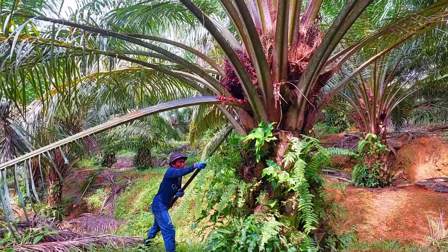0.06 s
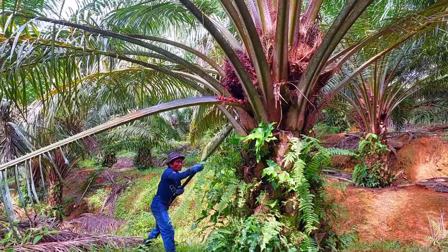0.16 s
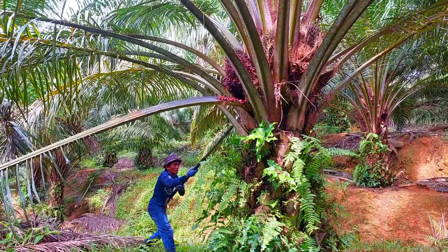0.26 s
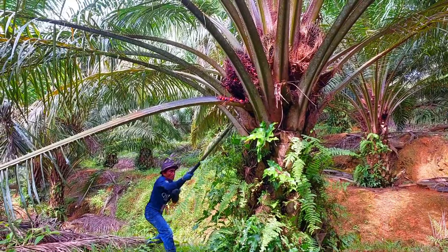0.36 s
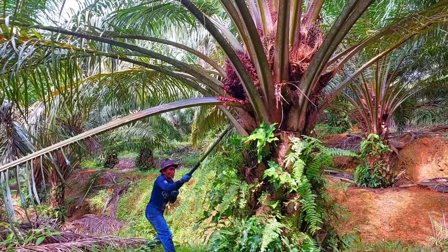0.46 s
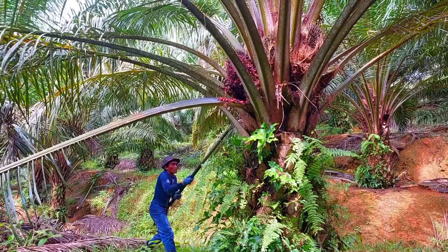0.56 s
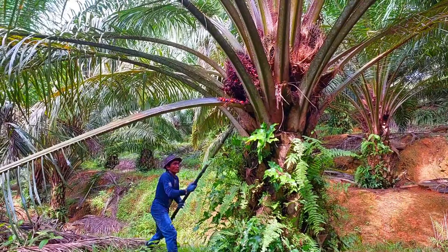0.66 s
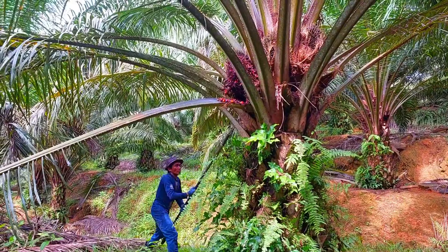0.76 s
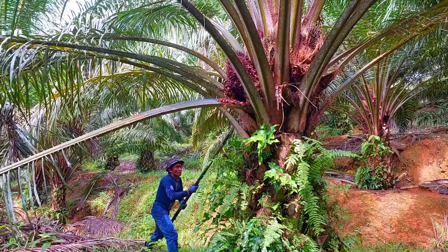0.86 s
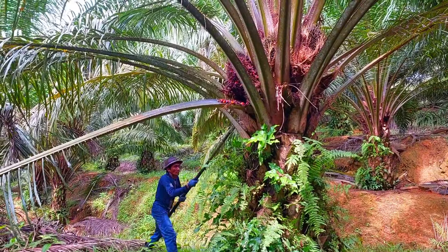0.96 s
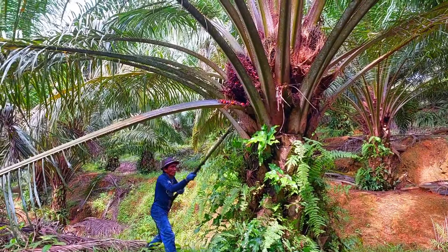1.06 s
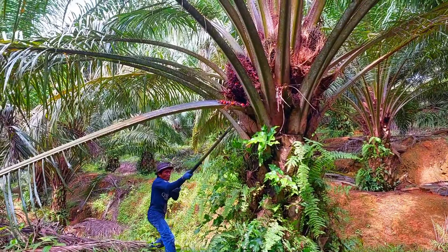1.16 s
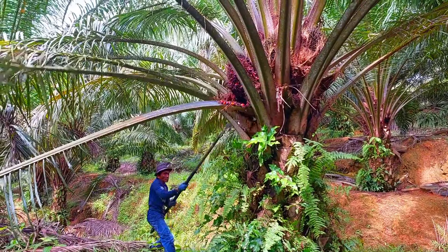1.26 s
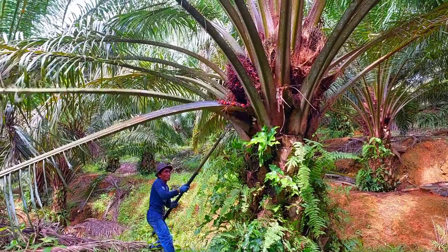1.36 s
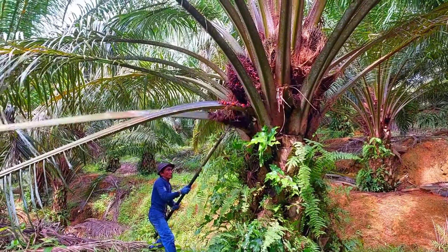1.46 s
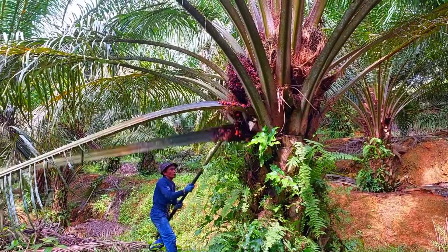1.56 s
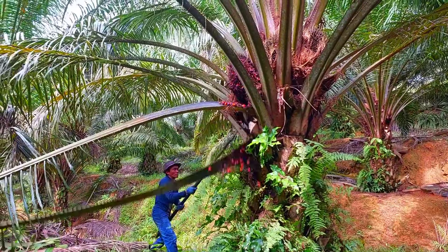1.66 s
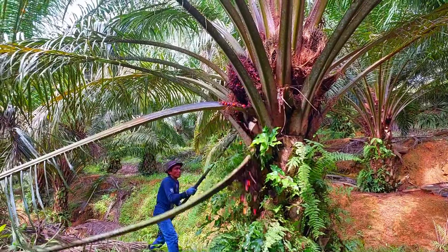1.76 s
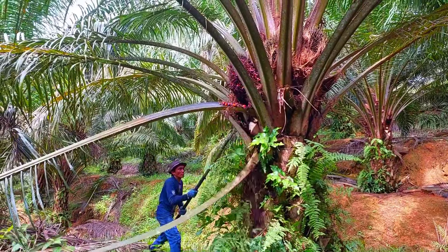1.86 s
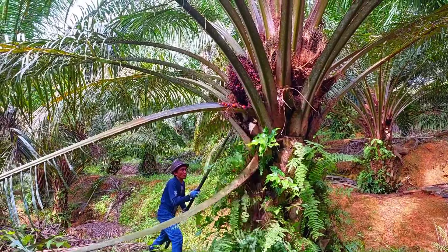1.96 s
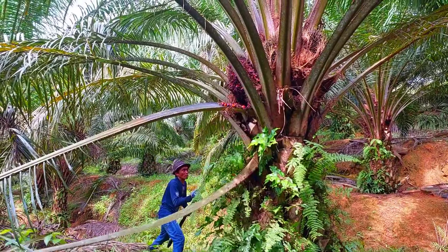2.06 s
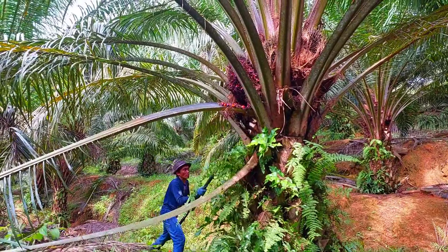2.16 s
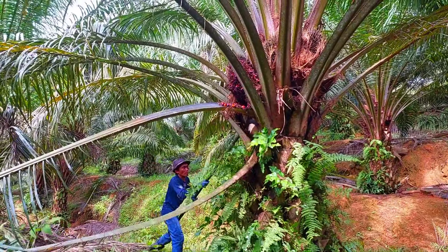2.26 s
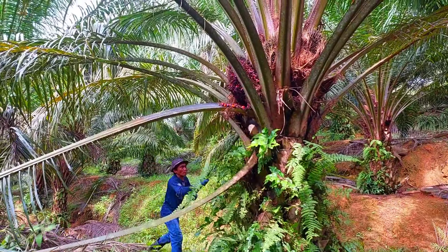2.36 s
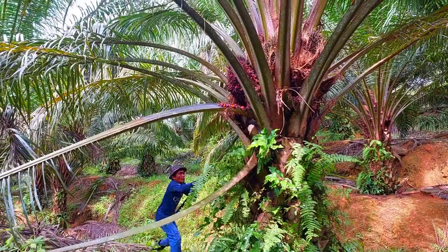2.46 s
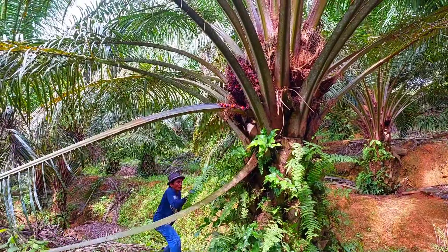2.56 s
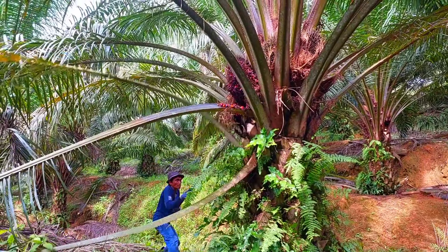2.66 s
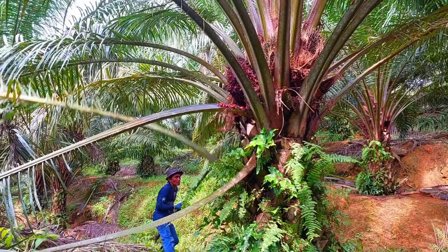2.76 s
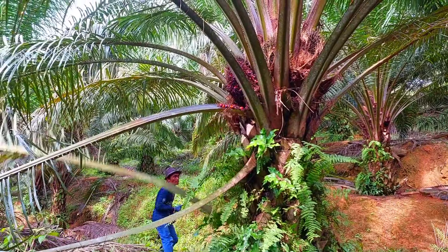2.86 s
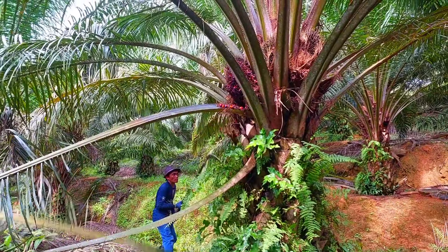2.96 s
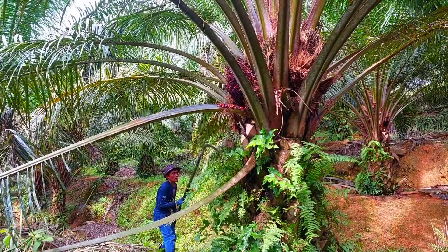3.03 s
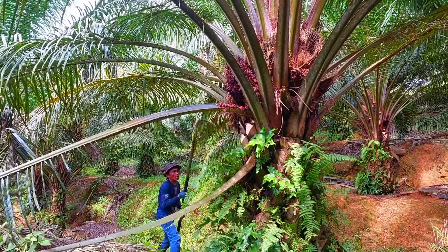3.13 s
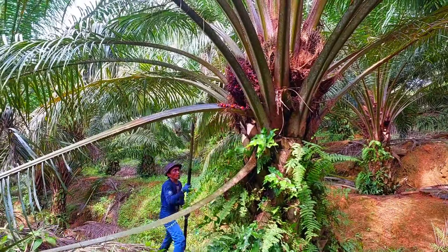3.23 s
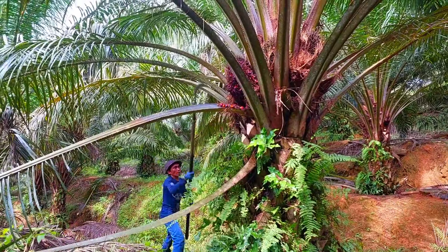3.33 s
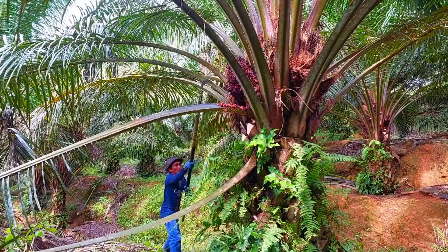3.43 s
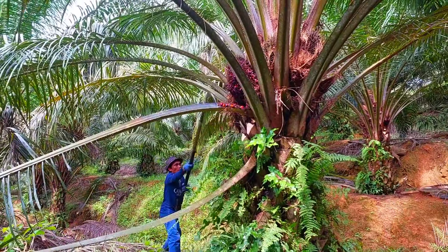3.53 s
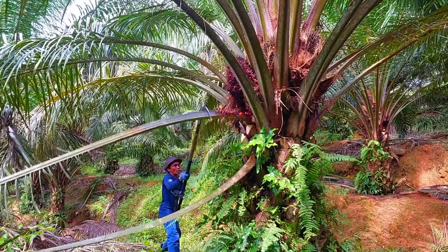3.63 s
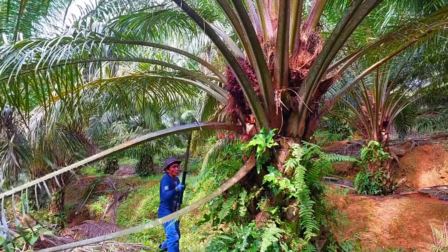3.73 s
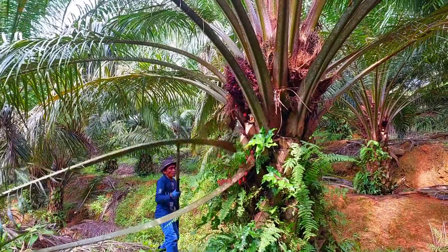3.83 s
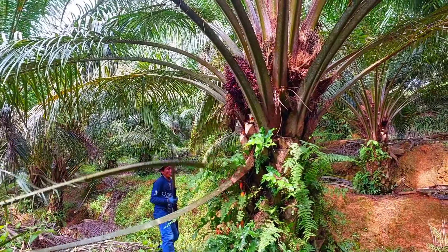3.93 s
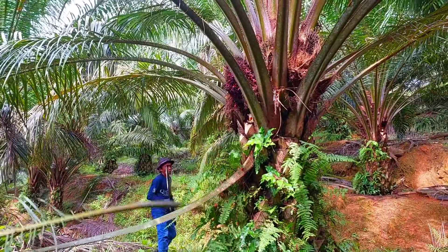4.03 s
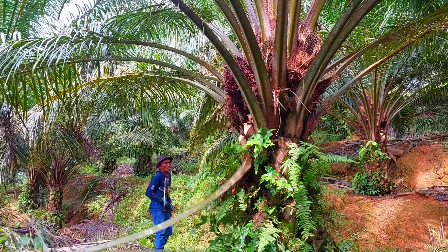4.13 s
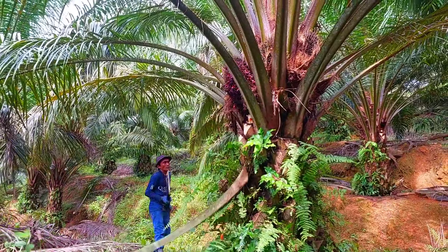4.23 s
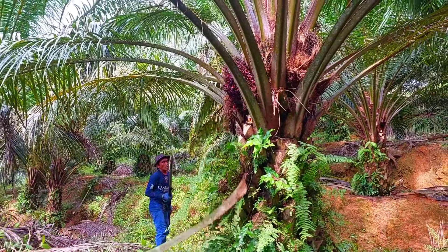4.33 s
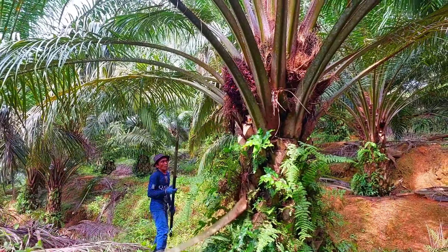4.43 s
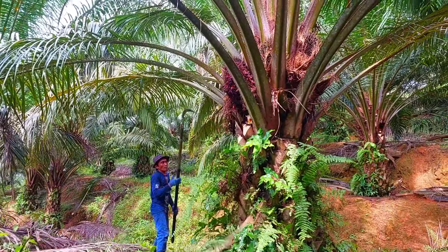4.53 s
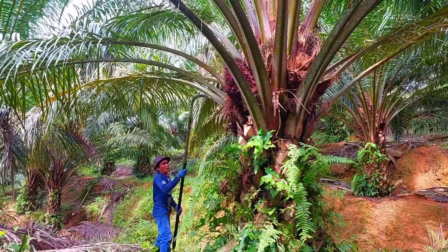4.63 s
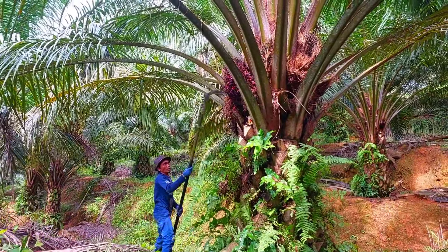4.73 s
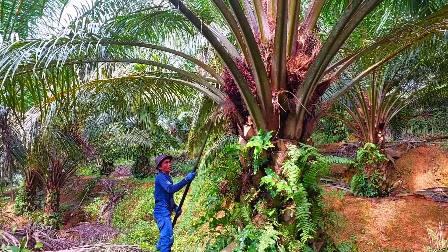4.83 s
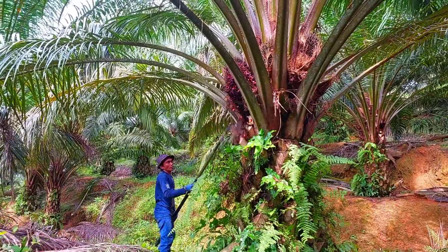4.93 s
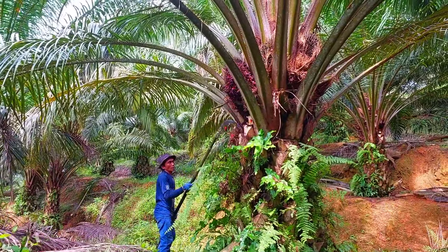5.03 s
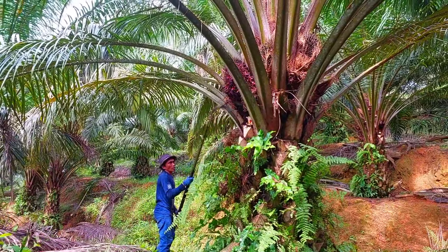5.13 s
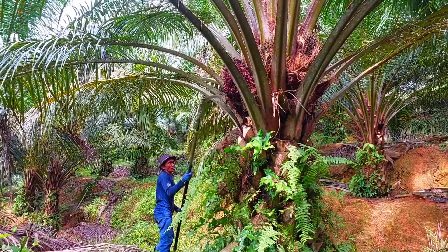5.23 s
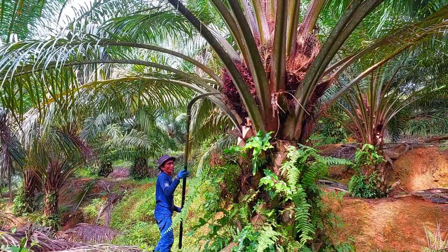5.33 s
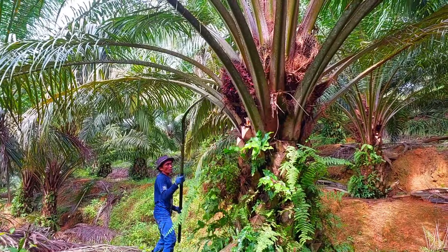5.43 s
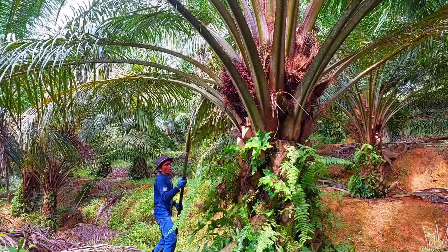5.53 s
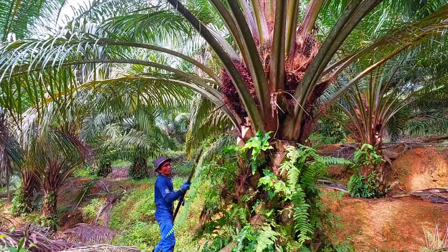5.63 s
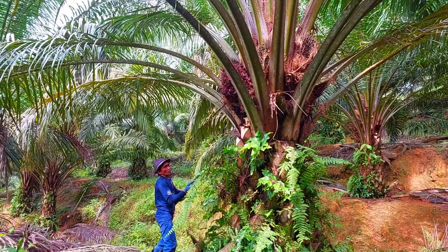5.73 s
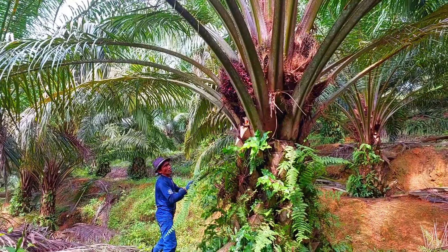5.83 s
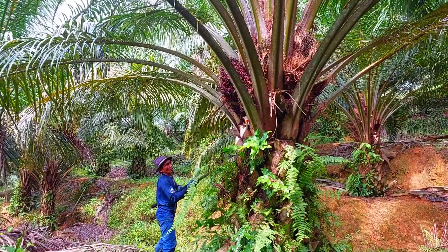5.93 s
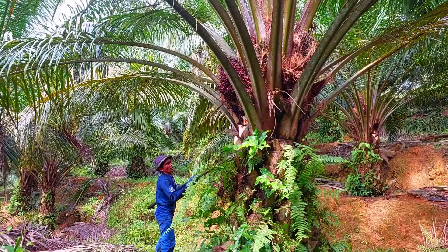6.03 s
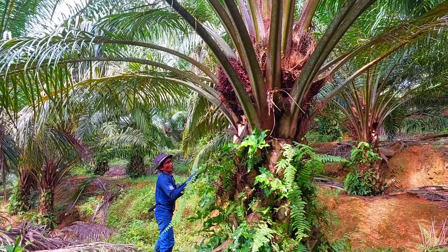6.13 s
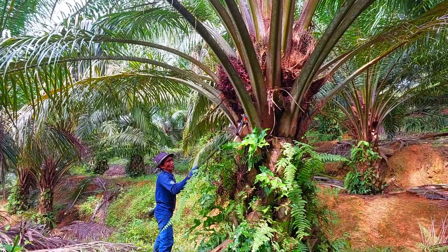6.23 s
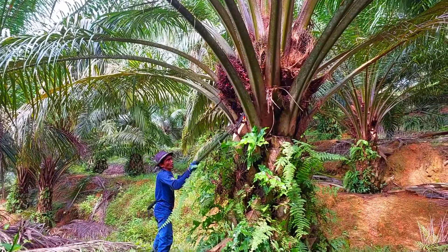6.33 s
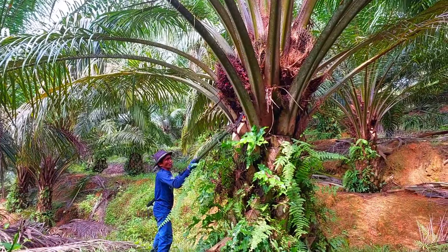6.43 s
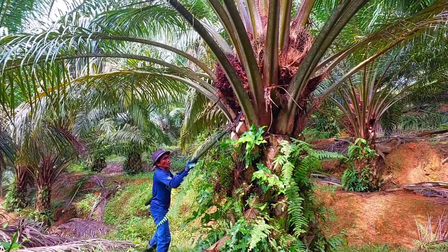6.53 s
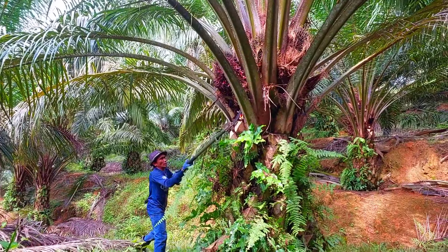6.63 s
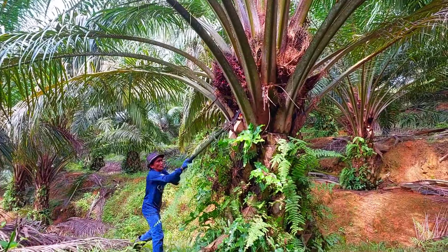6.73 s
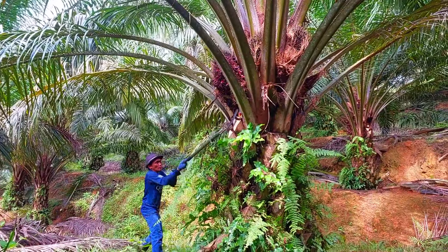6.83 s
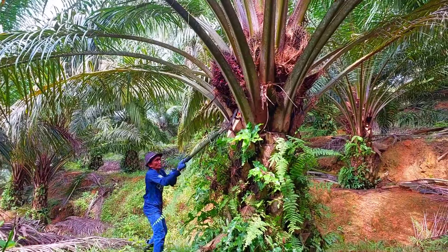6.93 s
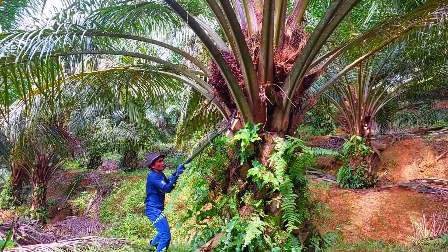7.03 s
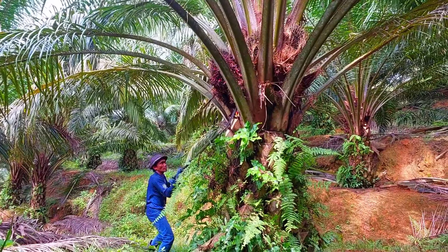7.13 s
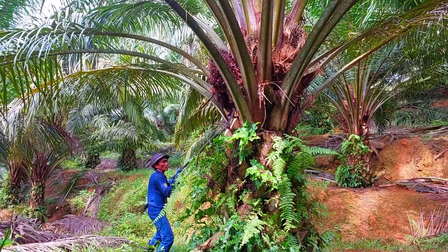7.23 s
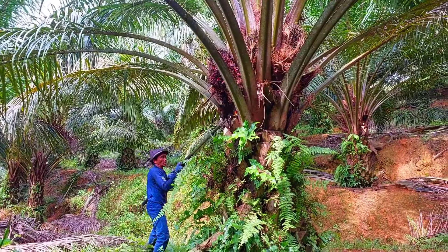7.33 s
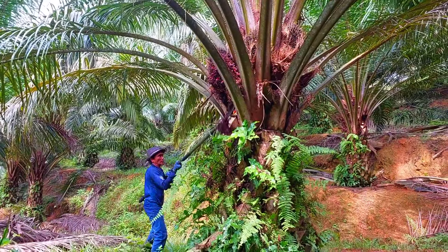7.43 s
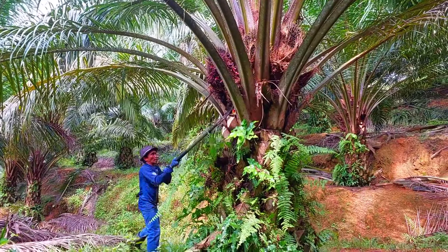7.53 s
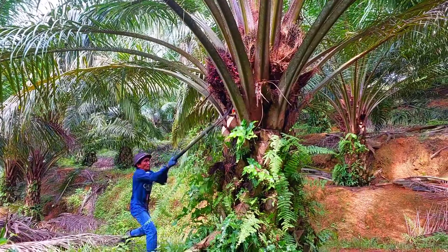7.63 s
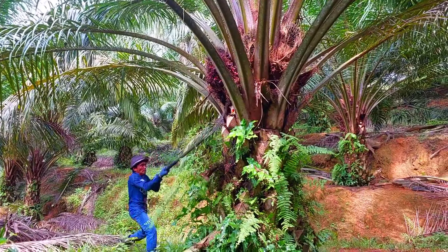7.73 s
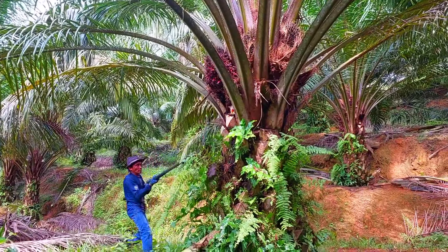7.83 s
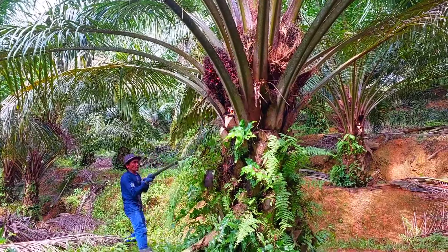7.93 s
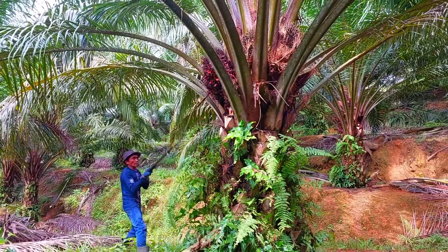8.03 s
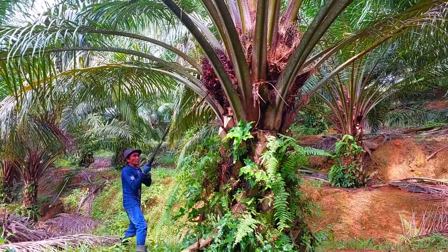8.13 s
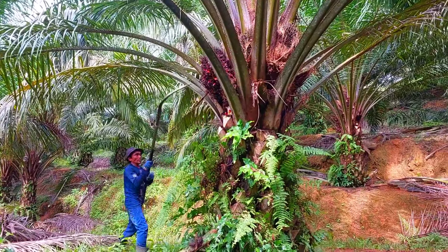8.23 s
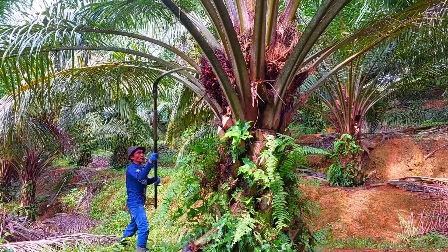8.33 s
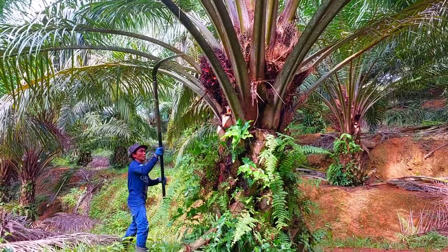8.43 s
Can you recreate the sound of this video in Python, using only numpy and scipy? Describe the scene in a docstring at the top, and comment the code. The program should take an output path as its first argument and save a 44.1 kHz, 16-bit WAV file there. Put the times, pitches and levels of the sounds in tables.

```python
"""A sickle on a long pole slices palm stalks in a plantation: fibres fracture in dense bursts of ticks.
Impacts excite resonances in the wood and the hollow pole. Cut fronds brush through leaves,
displace air in a low rumble and land on soft soil. Behind them lie the narrow-band buzz of cicadas
and a faint leafy hush. The sound reaches the two microphone ports of a phone a few metres away."""
import sys
import numpy as np
from scipy import signal
from scipy.fft import rfft, irfft, next_fast_len
from scipy.io import wavfile
from scipy.ndimage import uniform_filter1d

SR = 44100
rng = np.random.default_rng(int(sys.argv[2]) if len(sys.argv) > 2 else 0)


def transcribe(u):
    """Save the signal u as a 16-bit wav file named by the first command-line argument.

    u: samples, shape (n,) or (channels, n), limited to [-1, 1]; the rate is SR.
    q: integer samples, one column per channel.
    """
    v = np.clip(np.atleast_2d(u).T, -1, 1)
    q = np.round(v * 32767).astype(np.int16)
    wavfile.write(sys.argv[1], SR, q)


N = 374409

# Eight blade strokes: (time [s], tearing level [dB], stalk body [dB re tearing], hiss [dB re tearing])
BLADE_STROKES = [(0, -32.5, 4, -2.5), (0.02, -37.5, -11, -5), (0.04, -52.5, 3, 1), (0.065, -44, -2, -10),
                 (0.1, -64, 8, 1), (0.13, -55.5, -7, -9), (0.155, -90, -2, 0), (0.372, -71, 4, 5),
                 (0.381, -42.5, -4, 2), (0.41, -32.5, -11, 2.5), (0.432, -30.5, -13, 0.5),
                 (0.455, -36.5, -5, 2), (0.478, -34.5, -1, -0.5), (0.488, -49, -4, -12), (0.5, -56, -5, 0),
                 (0.525, -98, 0, 2), (1.19, -67.5, -23, 12), (1.203, -30.5, -30, 4),
                 (1.225, -20.5, -25, -3), (1.25, -24.5, -4, -2.5), (1.28, -31, -13, -3),
                 (1.31, -26.5, -23, -2), (1.34, -34, -2, 1.5), (1.37, -47, -15, -1), (1.395, -89, 0, 0),
                 (2.595, -62, -7, 4), (2.612, -27.5, -14, -2), (2.645, -26, -9, 0.5), (2.67, -25.5, -1, -1),
                 (2.7, -30.5, -7, -1), (2.72, -42, -5, 6.5), (2.76, -48, -5, 3), (2.79, -55, -14, 2),
                 (2.815, -82, 3, 0), (3.6, -71, -9, -3), (3.61, -36.5, 4, -3.5), (3.628, -30, -18, -4.5),
                 (3.645, -41.5, -10, -2), (3.68, -40.5, -12, -1), (3.72, -46, -10, -4),
                 (3.745, -85, 1, -2.5), (6.775, -93.5, -9, 4), (6.783, -56, -12, -7), (6.797, -45, -5, -14),
                 (6.805, -45.5, -2, -4), (6.85, -36, 1.5, -2.5), (6.885, -49.5, -1, 0), (6.92, -59, 3, -6),
                 (6.94, -71, -1, 1), (6.965, -88.5, 7, 10), (7.328, -68, -13, -9), (7.338, -36, 3, -18),
                 (7.355, -41.5, 0, -9), (7.375, -56, 8, -1), (7.4, -68, -3, 1), (7.425, -84, 3, 5),
                 (7.672, -73, -6, -9), (7.69, -33.5, -9, -10), (7.72, -36, -5, 1), (7.745, -32, -9, 1),
                 (7.765, -26, -17, -2), (7.8, -28, -8.5, 2), (7.838, -48, -2, -8), (7.85, -61, -9, 4),
                 (7.875, -85.5, 12, 3)]
# Spectrum of tearing fibre: (frequency [Hz], spectral level [dB])
FIBRE_SPECTRUM = [(47, -45), (80, -18), (130, -11.5), (257, 4), (391, -4), (809, -2), (944, -4),
                  (1910, -5.5), (2600, -10), (5750, -16.5), (8180, -24.5), (11900, -22.5), (15500, -28.5)]


def sickle():
    """Fracture: the edge tears fibre after fibre, and the thicker ones snap with a pitch."""
    db, body_db, hiss_db = curve(BLADE_STROKES)
    tear = crackle(FIBRE_SPECTRUM, body_db, hiss_db,
                   rate=900, spread_db=1, shared=.39, cycles=2, flicker_db=.5)
    return undb(db) * (tear + undb(-4) * snaps(rate=350, cycles=5, spread_db=12))


def snaps(rate, cycles, spread_db):
    """Damped free vibration: each breaking fibre or rib rings briefly at its own pitch."""
    out = np.zeros((2, N))
    for when, pitch, size, turn in rng.random((int(rate * N / SR), 4)):
        hz = 600 * 12 ** pitch
        swings = np.arange(int(3 * cycles * SR / hz)) * hz / SR
        lag = (1 - coherence(hz)) * turn * np.array([[0], [1]])  # out of step at the two ports
        ring = np.sin(2 * np.pi * (swings + lag)) * swings * np.exp(-2 * swings / cycles) / cycles
        add(out, when * N / SR, undb(spread_db * size) * ring)
    return unit(out)


def crackle(spectrum, low_db, high_db, rate, spread_db, shared, cycles, flicker_db):
    """Shot noise: short ticks modulate each octave of noise, some common to all octaves."""
    common = clicks(rate, spread_db)
    lows = mids = highs = 0
    for hz, noise in octaves(spectrum):
        ticks = shared * common + (1 - shared) * clicks(rate * (hz / 1500) ** .6, spread_db)
        decay = np.exp(-hz / (cycles * SR))
        power = signal.lfilter([1], np.poly([decay, decay / 2]), ticks)
        part = undb(flicker_db * walk(25)) * unit(np.sqrt(power)) * noise
        if hz < 400:
            lows += part
        elif hz < 3000:
            mids += part
        else:
            highs += part
    return unit(mids) + undb(low_db) * unit(lows) + undb(high_db) * unit(highs)


def clicks(rate, spread_db):
    """Poisson process: impulses of power with exponentially distributed, capped levels."""
    hit = rng.random(N) < rate / SR
    return hit * undb(2 * spread_db * np.minimum(rng.exponential(size=N), 3.5))


# Level and colour of leaves rustling between the blade strokes, joined into one curve:
# (time [s], level [dB], stems [dB re level], leaf tips [dB re level])
FROND_RUSTLE = [
    [(0.14, -63.5, 0, 2), (0.202, -66, 2, 1), (0.356, -66, -3, 0), (0.36, -75, -11, 4)],
    [(0.51, -63, 4, 5), (0.536, -57.5, 4, 3), (0.602, -58.5, -14, 7), (0.776, -53, -3.5, 2),
     (0.816, -57, -6, 5), (1.156, -66, -22, 5), (1.17, -62, -30, -4)],
    [(1.38, -41, -11, 4), (1.442, -47.5, -11, 6.5), (1.616, -39.5, -18, 2.5), (1.626, -31.5, -13, -3.5),
     (1.78, -37.5, -11.5, 2), (1.868, -34.5, -7, -1), (1.884, -38, -9.5, 2.5), (2.162, -44.5, -10.5, -1),
     (2.328, -42.5, 0, -3), (2.428, -52.5, -14, 1.5), (2.58, -49.5, -1.5, 1.5)],
    [(2.79, -49.5, -9, 6), (2.816, -53, -12, 6.5), (3.044, -43.5, -14.5, 3.5), (3.2, -27, -5.5, 2.5),
     (3.288, -42, -11, 5.5), (3.426, -45.5, -9, 4), (3.54, -54, -11, 3), (3.59, -54, -6, 1.5)],
    [(3.73, -41.5, -5.5, -3), (3.8, -38, -7.5, 0), (4.01, -45, -13, 1.5), (4.18, -37, -9, 0.5),
     (4.22, -37, -8, 10), (4.29, -36, -5.5, 0), (4.48, -40, -13, 0), (4.52, -38, -8.5, -2.5),
     (4.65, -42, -8.5, 1.5), (4.74, -44, -5, 1), (4.96, -52.5, -11, 3), (5.0, -45.5, 1.5, -6),
     (5.24, -60.5, -18, 3), (5.28, -57, 1, 1), (5.33, -52, -20, -2), (5.41, -56.5, -4, 4.5),
     (5.47, -57.5, -20, 3.5), (5.67, -57, -7, 1), (5.92, -64.5, -26, 3.5), (6.24, -66, -7, 5.5),
     (6.35, -57.5, 11.5, 2.5), (6.48, -77, -19, 6.5), (6.76, -71.5, -12.5, 6.5)],
    [(6.95, -73, -4, -2), (6.974, -68.5, 9, 3.5), (7.08, -70, -14, 1), (7.252, -69, -24, 1),
     (7.26, -72, 2, -2)],
    [(7.42, -68.5, 5, 8), (7.54, -69.5, -13, 3), (7.564, -54, -5, -4.5), (7.66, -51.5, -3, -0.5)],
    [(7.87, -57.5, -3, 6), (7.954, -56, -6, -3), (8.048, -60.5, -8, 1.5), (8.066, -57, -1, 0.5),
     (8.222, -65, -18, 3), (8.236, -55, -8, 1), (8.49, -63, -18, -0.5)],
]
# Spectrum of rustling leaves: (frequency [Hz], spectral level [dB])
LEAF_SPECTRUM = [(47, -34.5), (80, -10.5), (102, -11.5), (300, -2.5), (521, -6.5), (621, 0), (1200, 0),
                 (1910, 1.5), (3240, -4), (5620, -6), (8360, -14.5), (11900, -15), (15500, -19.5)]


def fronds():
    """Friction and impact: leaflets brush and slap in denser ticks than the cut, and ribs snap."""
    db, stems_db, tips_db = curve([row for span in FROND_RUSTLE for row in span])
    slaps_db = walk(40)
    brush = crackle(LEAF_SPECTRUM, stems_db, tips_db,
                    rate=1200, spread_db=2, shared=.29, cycles=2.8, flicker_db=1.65)
    ribs = undb(-7) * snaps(rate=120, cycles=4, spread_db=18)
    return undb(db + slaps_db) * (brush + ribs)


# Blade and pole striking wood, stems snapping:
# (time [s], level [dB], resonance [Hz], thud [dB re level], crack [dB re level], scrape T60 [s])
WOOD_KNOCKS = [(0.469, -26, 510, -15, 2, 0.05), (0.673, -40, 1860, -11, 0, 0.068),
               (0.917, -37.5, 854, -28, -31, 0.017), (1.22, -16, 660, -35, -26, 0.064),
               (1.299, -20.5, 800, -22, -12, 0.061), (1.627, -37, 1830, -1, -26, 0.05),
               (1.68, -23, 895, -31, -23, 0.054), (1.709, -28, 2200, -13, -13, 0.046),
               (1.758, -24, 1760, -23.5, -12, 0.041), (1.8, -26.5, 800, -24, -25, 0.082),
               (1.859, -22, 634, -14, -27, 0.031), (1.944, -26.5, 657, -28, -14, 0.036),
               (2.232, -22.5, 1070, -13, -35, 0.063), (2.298, -24.5, 1270, -7, -36, 0.11),
               (2.538, -24, 1200, -16, -30, 0.031), (2.691, -22.5, 1770, -31, -15, 0.03),
               (2.744, -26, 665, -9, -15, 0.033), (2.895, -36, 1890, -37, -10, 0.15),
               (3.15, -17.5, 1670, -15, 1, 0.063), (3.2, -23, 1970, -13, -12, 0.074),
               (3.216, -10.5, 2060, -17, -37, 0.034), (3.605, -31, 1850, -22, 3, 0.032),
               (3.653, -23.5, 1910, -20, -17, 0.044), (3.693, -24, 506, -14, -16, 0.047),
               (4.049, -22.5, 1960, -22, -34, 0.083), (4.145, -25, 1750, -9.5, 4.5, 0.093),
               (4.51, -19, 670, -31, -34, 0.082), (4.529, -17.5, 643, -27, -18, 0.025),
               (4.569, -26.5, 674, -28.5, -25, 0.028), (4.81, -43.5, 681, 8.5, -22, 0.05),
               (4.994, -26, 1610, -4, -1, 0.065), (5.005, -22, 685, -20, -39, 0.059),
               (5.028, -26.5, 890, -13, -37, 0.15), (5.101, -34, 756, -21, -35, 0.15),
               (5.143, -32.5, 1820, -21, -32, 0.034), (5.197, -41, 2080, -23, -17, 0.041),
               (5.273, -32, 800, -36, -33, 0.089), (5.284, -28.5, 1460, -49, -39, 0.04),
               (5.347, -34, 1480, -20, -26, 0.061), (5.409, -35.5, 685, -14, -20, 0.025),
               (5.548, -35.5, 1960, -23, 2, 0.062), (5.608, -34.5, 1560, -30, -22, 0.05),
               (5.652, -34, 870, -15.5, -39, 0.041), (6.021, -42.5, 2110, -26, -1, 0.058),
               (6.114, -47, 1870, -28, -24, 0.038), (6.266, -36, 795, -24, -34, 0.12),
               (6.333, -32.5, 690, -9, -21, 0.04), (6.444, -44.5, 1870, -25, -9.5, 0.055),
               (7.275, -38.5, 1200, -3, -17, 0.07), (7.284, -35, 1060, 3, -22, 0.089),
               (7.337, -33, 1210, 1, -10, 0.055), (7.359, -33.5, 815, -5, -36, 0.055),
               (7.561, -36.5, 596, -13, -31, 0.064), (7.64, -31, 2400, -10, -20, 0.017),
               (7.693, -20.5, 710, -10, -7, 0.045), (7.705, -30, 800, -11, -9, 0.05),
               (8.238, -33, 1360, -14.5, -25, 0.055), (8.301, -30.5, 970, -24, -36, 0.031),
               (8.335, -38.5, 1920, -28, -6, 0.05), (8.396, -45, 1730, -15, -18, 0.05)]


def knocks(thud_hz=273.5, thud_t60_s=.055):
    """Forced resonance: a brief scraping contact rings the wood, with a dull thud and a short crack."""
    out, t = np.zeros((2, N)), np.arange(SR // 7) / SR

    def fade(t60, rise_s):
        return (1 - np.exp(-t / rise_s)) * 1000 ** (-t / t60)

    for s, db, hz, thud_db, crack_db, t60 in WOOD_KNOCKS:
        noise = rng.standard_normal((3, len(t)))
        scrape = at_ports(noise, hz) * fade(t60, .002)
        ring = steep_band(scrape, hz, .55 * hz) + .25 * band(band(scrape, 1300, 3300), 1000, 3000)
        detune = 1 + .08 * noise[0, 0]
        thud = np.sin(2 * np.pi * thud_hz * detune * t) * fade(thud_t60_s, .004)
        crack = band(noise[1:] * fade(.6 * t60, .0006), 6500, 9000)
        for part_db, part in (0, ring), (thud_db, thud), (crack_db, crack):
            add(out, s - .002, undb(db + part_db) * part / np.abs(part).max())
    return out


# Side blow on the pole: (time [s], level [dB])
POLE_BLOWS = [(4.723, -20)]
# Modes of the pole: (frequency [Hz], relative level [dB], T60 [s])
POLE_MODES = [(773, 16, 0.037), (1422, 7, 0.046), (2190, 10.5, 0.038), (2800, 5, 0.039), (3480, -6, .02),
              (4300, -10, .02)]


def pole(port_lag_s=.00012):
    """Modal vibration: the struck hollow pole rings in damped modes while the contact rattles."""
    out, t = np.zeros((2, N)), np.arange(SR // 7) / SR
    port_t = t + [[0], [port_lag_s]]
    tube = sum(undb(db) * np.sin(2 * np.pi * hz * port_t) * 1000 ** (-t / t60)
               for hz, db, t60 in POLE_MODES)
    onset = (1 - np.exp(-(t / .008) ** 2)) ** 2
    for s, db in POLE_BLOWS:
        rattle = 1 + .5 * unit(band(rng.standard_normal(len(t)), 280, 600))
        add(out, s, undb(db) * onset * tube * rattle)
    return out


# Heavy stalks landing: (centre time [s], level [dB], frequency [Hz])
STALK_LANDINGS = [(3.036, -35, 55), (3.086, -30, 90), (3.155, -23, 125), (3.405, -32, 110), (4.24, -30, 80),
                  (4.41, -37, 100), (4.53, -33, 90), (4.722, -35, 140)]


def thumps():
    """Inelastic impact: soil yields softly, giving a pulse of about one and a half cycles."""
    out, t = np.zeros((2, N)), np.arange(-SR // 20, SR // 20) / SR
    for s, db, hz in STALK_LANDINGS:
        envelope = np.exp(-(t * hz / .55) ** 2)
        add(out, s + t[0], -undb(db) * np.cos(2 * np.pi * hz * t - .6) * envelope)
    return out


# Air pushed by fronds as they fall and land: (time [s], level [dB])
AIR_PUSH = [(0.0, -49), (0.09, -65), (1.11, -69), (1.28, -44), (1.49, -67), (1.63, -49.5), (2.39, -58),
            (2.43, -72), (2.65, -50), (2.88, -68), (3.03, -46), (3.17, -36), (3.33, -59), (3.4, -45),
            (3.52, -65), (3.64, -50.5), (4.07, -65), (4.26, -38), (4.35, -54), (4.54, -44), (4.63, -54),
            (4.73, -48), (4.94, -73), (5.04, -56), (5.18, -81), (5.72, -59.5), (6.03, -75), (6.93, -69.5),
            (7.14, -86.5), (7.38, -51), (7.49, -90), (7.78, -53), (7.97, -70), (8.39, -56), (8.49, -88)]


def gusts():
    """Air displacement: falling fronds make a soft rumble, with the ground's boom on top."""
    low = unit(steep_band(rng.standard_normal((3, N)), 52, 50))
    boom = unit(steep_band(rng.standard_normal(N), 120, 60))
    rumble = .61 * low[0] + .41 * low[1:]  # partly different at the two ports
    air = rumble + undb(-9.5 + 2.4 * walk(25)) * boom
    return undb(curve(AIR_PUSH)[0] + 2 * walk(9.5)) * air


# Cicada band, its overtone, other insects: (frequency [Hz], width [Hz], level [dB], swell [dB])
INSECT_BANDS = [(7020, 300, -63, 0), (13900, 1000, -82.5, 0.5), (4950, 400, -78, 5.5)]


def insects():
    """Incoherent summation: a chorus merges into grainy noise bands; cicadas hold, others come and go."""
    out = np.zeros((2, N))
    for hz, width, db, swell_db in INSECT_BANDS:
        buzz = unit(steep_band(rng.standard_normal((2, N)), hz, width))
        out += undb(db + swell_db * walk(2) + 1.3 * walk(80)) * buzz
    return out


# Spectrum of the distant hush: (frequency [Hz], spectral level [dB])
HUSH_SPECTRUM = [(18, -24.5), (30, 12.5), (66, 1.5), (449, -25), (1670, -14), (2540, -11.5), (6050, -17.5),
                 (7090, 3), (10200, -39), (14000, -12), (16000, -21.5)]


def hush(db=-66):
    """Broadband noise: far leaves blend into a faint hiss whose level wavers."""
    gain = undb(db + 1.2 * walk(3) + 1.2 * walk(30))
    return gain * unit(sum(noise for _, noise in octaves(HUSH_SPECTRUM)))


# Level difference between the ports: (frequency [Hz], left minus right [dB])
PORT_BALANCE = [(60, 1), (200, .5), (500, -1), (1300, -6), (2400, -4.5), (4400, 2), (8000, 6), (15000, 10)]


def grove_to_phone(x, t60_s=.25, tail_db=-11.5):
    """Reflection and diffraction: trunks and leaves add a thin tail; the phone body colours each port."""
    size = next_fast_len(N + SR)
    hz, t = np.arange(size // 2 + 1) * SR / size, np.arange(SR // 2) / SR
    tail = rng.standard_normal((2, len(t))) * 1000 ** (-t / t60_s) * (t > .012)
    tail /= np.linalg.norm(tail, axis=1, keepdims=True)
    grove = undb(tail_db) * rfft(tail, size) * hz / (hz + 600)
    tilt = undb(at_hz(PORT_BALANCE, hz) / 2 * np.array([[1], [-1]]))
    cavity = undb(5 * np.exp(-((hz - 2000) / 330) ** 2))  # resonance of the port cavity
    return irfft(rfft(x, size) * (1 + grove) * tilt * cavity, size)[:, :N]


# Sound common to both ports: (frequency [Hz], share of power [0-1])
PORT_COHERENCE = [(40, .6), (70, .85), (130, .98), (290, .95), (640, .78), (1400, .2), (3000, .12),
                  (7000, 0)]


def coherence(hz):
    """Spatial coherence: the ports share the bass and hear unrelated treble."""
    return at_hz(PORT_COHERENCE, hz)


def at_ports(noise, hz):
    """Power addition: common, left and right noise mix into a partly coherent pair."""
    alike = coherence(hz)
    return np.sqrt(alike) * noise[0] + np.sqrt(1 - alike) * noise[1:]


def octaves(spectrum):
    """Octave analysis: yields each centre frequency with its slice of coloured stereo noise."""
    size = next_fast_len(N)
    hz = np.maximum(np.arange(size // 2 + 1) * SR / size, 1)
    noise = undb(at_hz(spectrum, hz)) * at_ports(rfft(rng.standard_normal((3, size))), hz)
    for centre in 125 * 2 ** np.arange(8):
        window = np.cos(np.pi / 2 * np.clip(np.log2(hz / centre), -1, 1))
        yield centre, irfft(noise * window, size)[:, :N]


def band(x, hz, width):
    """Two-pole resonance, gain 1 at the centre."""
    return signal.lfilter(*signal.iirpeak(hz, hz / width, fs=SR), x)


def steep_band(x, hz, width):
    """Two equal resonances in cascade."""
    return band(band(x, hz, width), hz, width)


def walk(rate):
    """Random modulation: ramps between Gaussian values, `rate` a second."""
    k = int(SR / rate)
    return uniform_filter1d(np.repeat(rng.standard_normal(N // k + 1), k), k)[:N]


def at_hz(table, hz):
    """Interpolation on a log-frequency axis."""
    freqs, values = np.transpose(table)
    return np.interp(np.log(np.maximum(hz, 1)), np.log(freqs), values)


def curve(rows):
    """Interpolation in time, one envelope a column."""
    times, *columns = np.transpose(rows)
    return [np.interp(np.arange(N) / SR, times, column) for column in columns]


def undb(db):
    return 10 ** (np.asarray(db) / 20)


def unit(x):
    return x / np.sqrt(np.mean(x ** 2))


def add(out, s, sound):
    i = int(s * SR)
    out[:, i:i + sound.shape[-1]] += sound[..., :N - i]


def scene():
    """Superposition: the harvest and its reflections add to moving air, far leaves and insects."""
    harvest = sickle() + fronds() + knocks() + pole() + thumps()
    return grove_to_phone(harvest) + gusts() + hush() + insects()


def record(dry, cutoff_hz=15550):
    """Band limiting: the phone cuts the highest treble."""
    return signal.sosfilt(signal.ellip(10, .2, 80, cutoff_hz, fs=SR, output="sos"), dry)


dry = scene()
out = record(dry)
transcribe(out)
```